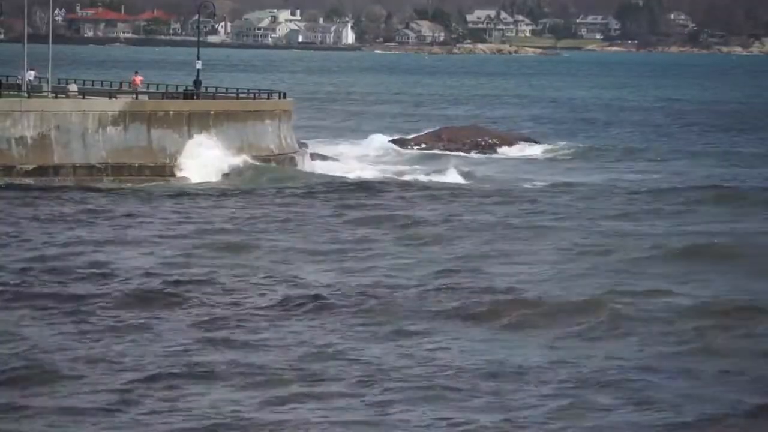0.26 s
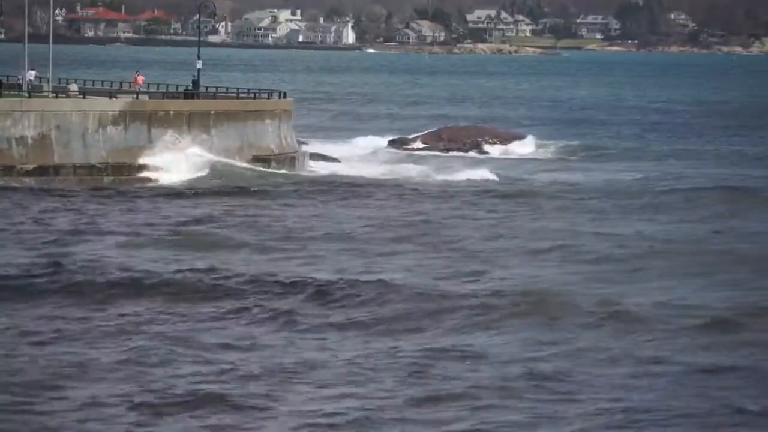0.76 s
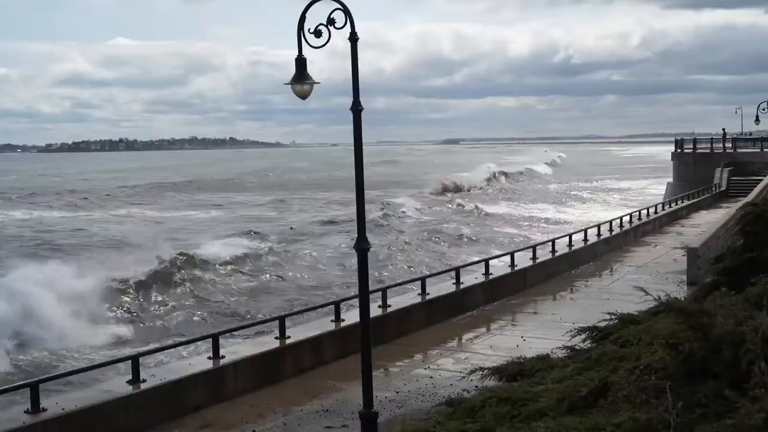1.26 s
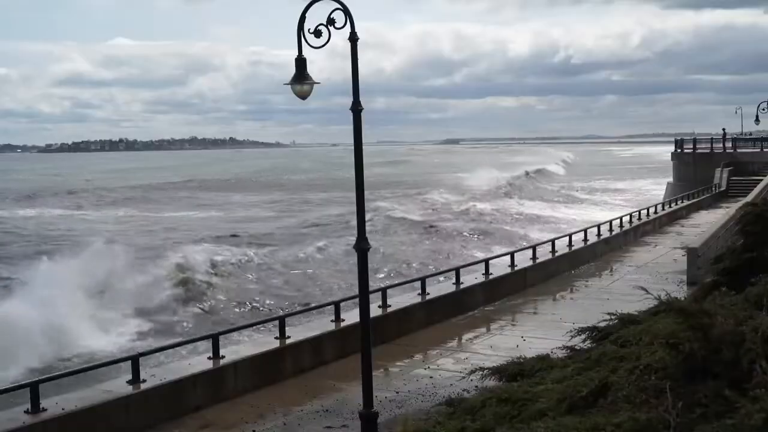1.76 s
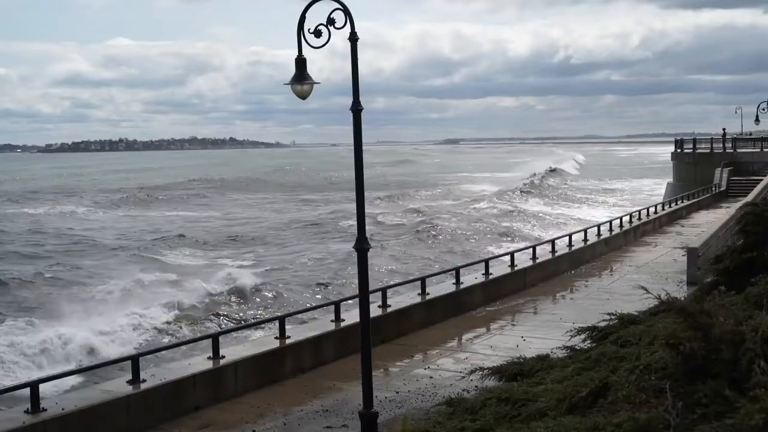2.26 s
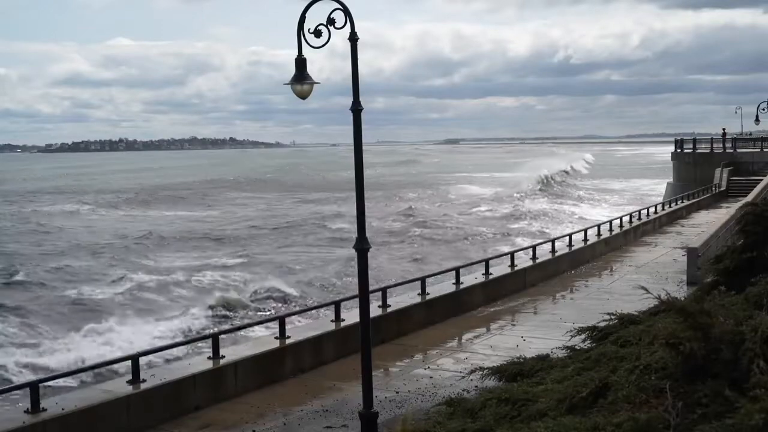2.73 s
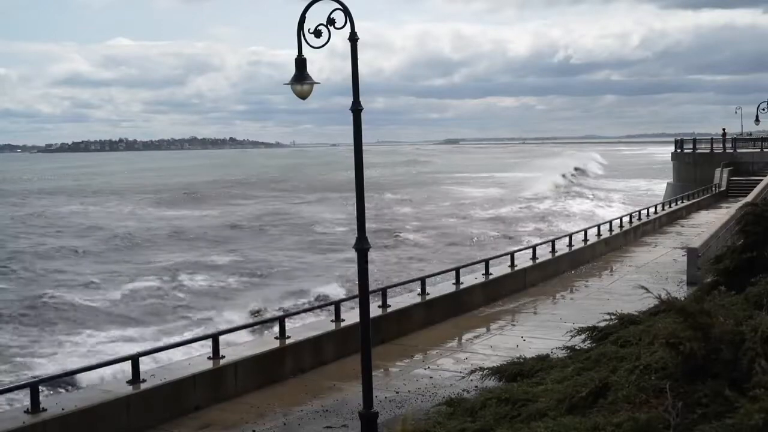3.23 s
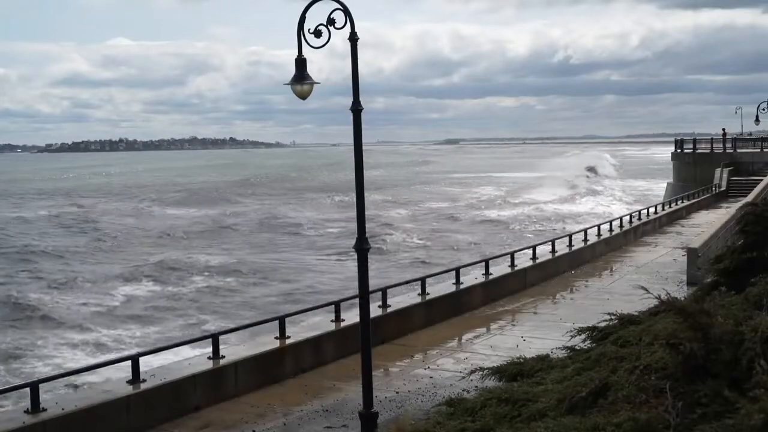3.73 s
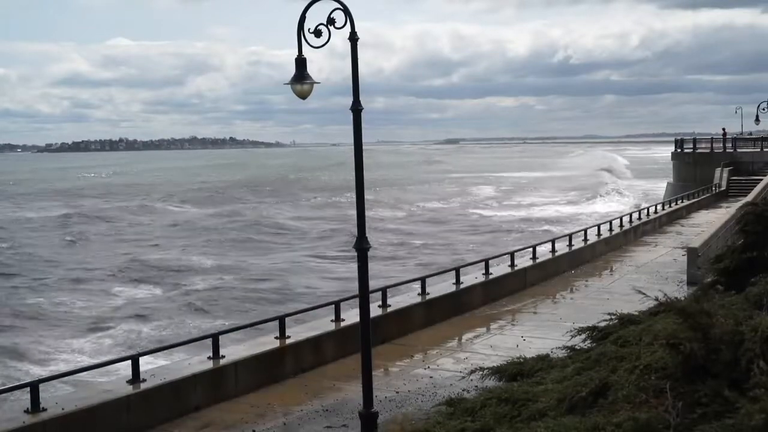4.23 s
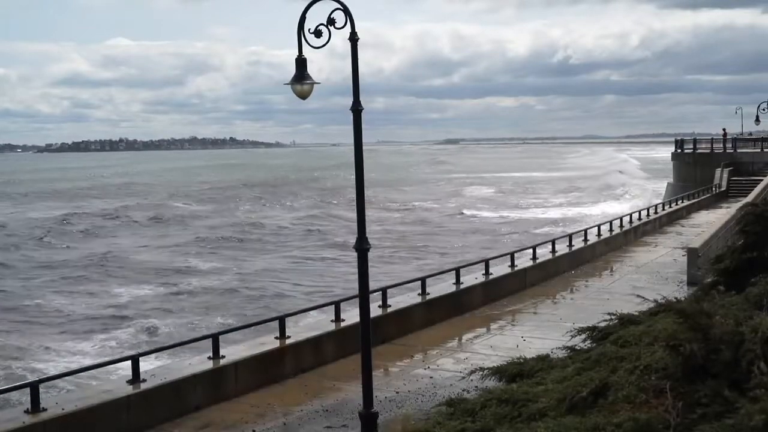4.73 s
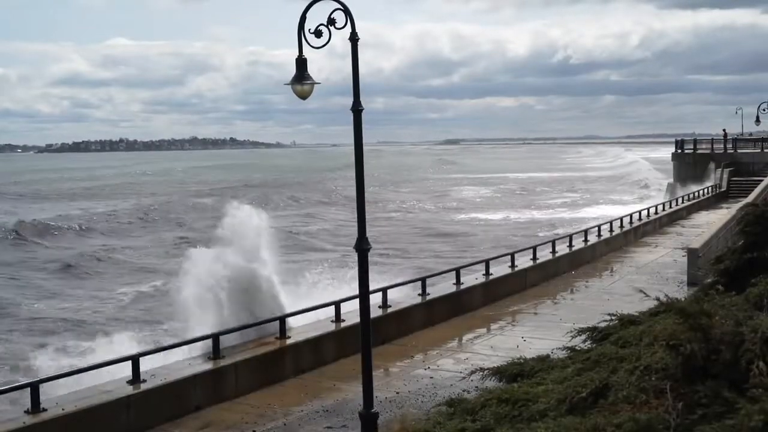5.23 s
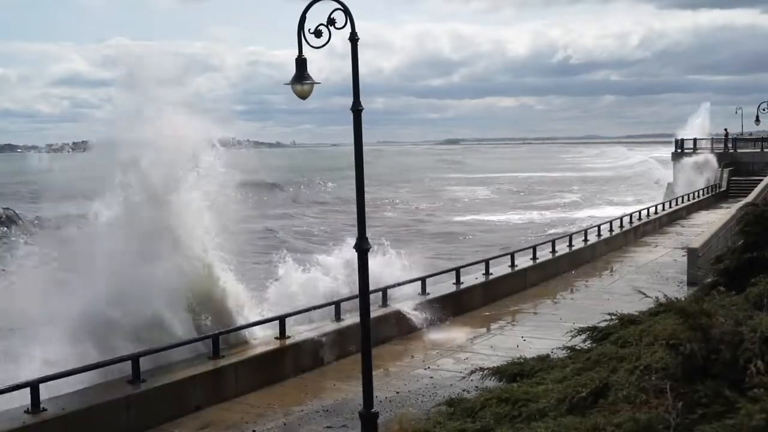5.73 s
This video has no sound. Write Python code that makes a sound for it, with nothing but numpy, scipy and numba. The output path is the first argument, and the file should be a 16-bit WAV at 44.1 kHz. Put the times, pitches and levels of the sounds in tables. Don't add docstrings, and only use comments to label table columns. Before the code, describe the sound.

Outdoors on a stormy coast, far-off surf murmurs under wind thumps for just over a second, then a click and sudden cut bring louder, closer wash. Breakers hiss with spray, then water drains back hollowly under the wall. Wind calms, then batters the unprotected microphone hard, clipping and ducking the surf.

```python
import sys
import numpy as np
from scipy import signal
from scipy.io import wavfile
from scipy.ndimage import uniform_filter1d
from numba import njit

SR = 44100
rng = np.random.default_rng(int(sys.argv[2]) if len(sys.argv) > 2 else 0)


def int16_out(signal):
    q = np.round(np.clip(np.atleast_2d(signal).T, -1, 1) * 32767)
    wavfile.write(sys.argv[1], SR, q.astype(np.int16))


def invert_db(x):
    u = np.asarray(x, float) / 20
    return 10 ** u


N = 264159
T = np.arange(N) / SR
CHANGE_S = 1.2904


def unit(x):
    return x / np.sqrt(np.mean(x ** 2))


def power(db):
    return invert_db(2 * np.asarray(db))


def curves(table):
    s, *cols = np.transpose(table)
    return [np.interp(T, s, col) for col in cols]


def band(x, lo_hz, hi_hz):
    return signal.sosfilt(signal.butter(2, [lo_hz, hi_hz], "band", fs=SR, output="sos"), x)


def band_around(x, hz, width_hz):
    return band(x, hz - width_hz / 2, hz + width_hz / 2)


def noise_band(lo_hz, hi_hz):
    return unit(band(rng.standard_normal(N), lo_hz, hi_hz))


def walk(rate):
    hold = int(SR / rate)
    steps = np.repeat(rng.standard_normal(N // 500), hold)[:N]
    return unit(uniform_filter1d(uniform_filter1d(steps, hold), hold))


def near_change():
    return np.exp(-np.abs(T - CHANGE_S) / .008)


def surges(rows):
    total = 0
    for s, db, rise, fall in rows:
        below_peak = np.where(T < s, (s - T) / rise, (T - s) / fall)
        total = total + power(db - 10 * below_peak)
    return total


# time in seconds, level in dB.
OPEN_SEA = [(0, -36), (.25, -37.5), (.5, -36), (1.29, -35), (1.291, -27.5), (1.45, -38.5), (1.75, -39),
            (2.2, -36.5), (2.6, -35), (2.9, -33.5), (3.5, -35.5), (4.1, -39), (4.5, -39), (5.0, -35),
            (5.3, -39.5), (5.6, -37.5), (5.8, -43.5), (5.99, -42.5)]
# peak in seconds, level in dB, rise in seconds, fall in seconds.
BREAKING_WAVES = [(.55, -45.5, .6, 3), (1.291, -33, .0002, 2.7), (1.93, -32.5, 0.37, 0.55),
                  (2.25, -30, 0.44, 0.31), (2.65, -42.5, 0.24, 0.28), (3.25, -44, .3, 0.12),
                  (3.53, -44, 0.11, 0.29), (4.65, -44, 0.28, 0.31), (4.97, -44, 0.17, 0.37),
                  (5.3, -38, 0.33, 0.4), (5.6, -48, 0.39, 0.083), (6.0, -37.5, 0.21, .2)]
# peak in seconds, level in dB, rise in seconds, fall in seconds.
SPRAY_BURSTS = [(.13, -52.5, .2, 0.44), (.5, -51.5, 0.26, 2.9), (1.0, -55, 0.34, 0.32),
                (1.292, -46, .0002, 0.57), (1.92, -39.5, 0.19, 0.45), (2.24, -41, 0.18, 0.21),
                (2.62, -43.5, .3, .15), (3.47, -54, 0.39, 0.23), (4.65, -60, 0.25, 0.18),
                (5.28, -54.5, 0.12, 0.71), (5.55, -48.5, 0.24, 0.25), (5.75, -52, 0.085, .3),
                (5.99, -45.5, .2, .2)]
# peak in seconds, level in dB, rise in seconds, fall in seconds.
DRAINING = [
    (.6, -44, .3, .8),
    (1.45, -39, .15, 0.36),
    (2.1, -37, 0.18, 0.46),
    (3.4, -36, 0.33, 0.51),
    (3.7, -34, 0.3, 0.63),
    (4.05, -43, 0.27, 0.25),
    (4.3, -35.5, 0.47, 0.63),
    (4.66, -34, 0.21, 0.13),
    (4.95, -39.5, 0.3, 0.11),
]


def sea_levels():
    kinds = [(power(curves(OPEN_SEA)[0]), (-0.5, -3.5, -6, -26, -38)),
             (surges(BREAKING_WAVES), (-1.5, -5, 3, -10, -12)),
             (surges(DRAINING), (-4, -2, -5, -37, -40)),
             (surges(SPRAY_BURSTS), (-10, -10, -19, 0.5, 3))]
    return 10 * np.log10(sum(power(colour_db)[:, None] * p for p, colour_db in kinds))


def hollow():
    ring = unit(band_around(rng.standard_normal(N), 994, 270))
    return ring * invert_db(-0.5) * np.sqrt(surges(DRAINING))


@njit
def bubbles(start, hz, size):
    cycles, glide = 2.5, 0.43
    out = np.zeros(N)
    for k in range(len(start)):
        phase, length = 0., int(3 * cycles * SR / hz[k])
        for i in range(min(length, N - start[k])):
            phase += 2 * np.pi * hz[k] * (1 + glide * i / length) / SR
            out[start[k] + i] += size[k] * np.exp(-6. * i / length) * np.sin(phase)
    return out


def fizz():
    where, pitch, luck = rng.random((30000, 3)).T
    size = invert_db(np.minimum(-3.0 * np.log(luck), 12))
    return unit(bubbles((where * N).astype(np.int64), 500 * 24 ** pitch, size))


WATER_HZ = [480, 1000, 2800, 7500, 13000]
# frequency in Hz, level per third-octave band in dB.
SEA_COLOUR = [(60, 0), (150, 0.5), (300, -0.5), (420, 3.5), (600, 8.5), (1000, 7), (1300, 3.5), (1650, 2),
              (2100, 0), (2600, 0), (3400, -2), (4100, -0.5), (6500, -3.5), (9000, -2), (12000, -11.5),
              (14000, -8.5), (16000, -15)]


def surf():
    levels, foam_fizz = sea_levels(), fizz()
    colour_hz, band_db = np.transpose(SEA_COLOUR)
    out, surge, patch = 0, walk(7.8), walk(2.86)
    for hz in 63 * 2 ** np.arange(0, 8.1, 1 / 3):
        share = np.array([np.interp(np.log(hz), np.log(WATER_HZ), row) for row in np.eye(len(WATER_HZ))])
        colour_db = np.interp(np.log(hz), np.log(colour_hz), band_db) - 6
        patch = unit(2.4 * patch + 0.19 * walk(2.1))
        heave_db = 0.78 * surge + 0.28 * patch + 0.36 * walk(20)
        water = unit(band(rng.standard_normal(N) + 0.54 * foam_fizz, hz / 1.15, hz * 1.123))
        out = out + water * invert_db(share @ levels + colour_db + heave_db)
    return out + hollow()


# time in seconds, level in dB.
WIND_STRENGTH = [(0, -14.5), (.25, -29), (.37, -34), (.55, -19), (.8, -24), (1.1, -22), (1.35, -21),
                 (1.55, -28.5), (2.45, -31), (3.0, -24), (3.58, -25.5), (3.68, -10), (4.2, -8.5),
                 (4.66, -14), (4.76, -10), (5.2, -10), (5.5, -13.5), (5.99, -12)]
# time in seconds, rumble in dB, length in seconds, flutter above rumble in dB.
ROLLING_EDDIES = [(0.25, -10, 0.045, -24), (0.438, -14, 0.035, -25), (0.494, -22.5, 0.022, 10),
                  (0.633, -8.5, .04, -31), (0.72, -15, 0.031, -20), (0.952, -14.5, 0.063, -21),
                  (1.29, -20, .1, -16), (1.674, -35.5, 0.05, 3), (1.785, -35, 0.032, 1),
                  (2.25, -34.5, 0.066, 13), (2.566, -22, 0.036, -12), (2.78, -35.5, 0.14, 9.5),
                  (3.033, -21.5, 0.069, -5), (3.29, -19, 0.056, -2), (3.381, -27.5, .04, 6.5),
                  (3.48, -19, 0.044, -10), (3.85, -14, 0.046, -7), (3.972, -10.5, 0.23, -3),
                  (4.207, -9, 0.023, -20), (4.41, -10, 0.06, -18), (4.667, -35, 0.026, 7),
                  (4.813, -8.5, 0.059, -30), (4.934, -20.5, 0.039, 8.5), (5.056, -3, 0.037, -3.5),
                  (5.175, -20, 0.11, 7.5), (5.33, -7, 0.092, -6), (5.55, -20, 0.13, 8.5),
                  (5.634, 1.5, 0.041, -17), (5.782, -15, .06, 1), (5.857, -7, 0.15, -28)]


def gusts():
    wind_db = curves(WIND_STRENGTH)[0]
    slow, quick = 0, 0
    for s, db, length, flutter_db in ROLLING_EDDIES:
        bump = np.exp(-((T - s) / length) ** 2)
        slow = slow + power(db) * bump
        quick = quick + power(db + flutter_db) * bump
    rumble = power(wind_db - 2.5) + slow
    flutter = power(-19 + 0.48 * wind_db) + quick
    rustle = power(-32.5 + 0.064 * wind_db) + power(-22.5) * quick
    return 10 * np.log10([rumble, flutter, rustle])


# time in
# seconds, # signed pressure, width in ms.
BUFFETS = [(0.13, -0.39, 11.6), (0.2418, -0.37, 18), (0.4867, 0.5, 16), (0.661, 0.38, 19),
           (0.7527, -0.45, 6.9), (0.7667, 0.57, 8.7), (3.8192, -0.6, 12), (3.9598, 0.61, 8.6),
           (4.0329, -0.66, 7.6), (4.1253, -0.72, 11.1), (4.1533, 0.59, 7.7), (4.18, -0.59, 10.9),
           (4.873, -0.63, 11.1), (4.951, -0.62, 11.4), (5.0579, 0.68, 5.9), (5.0793, -0.64, 17.7),
           (5.1118, 0.57, 8.1), (5.1575, 0.62, 6.2), (5.277, 0.72, 9.4), (5.3222, 0.74, 10.2),
           (5.367, 0.7, 10.3), (5.599, 0.64, 5.6), (5.6185, 0.71, 8.1), (5.6469, 0.71, 7.2),
           (5.6564, -0.67, 14), (5.6994, -0.64, 4.6), (5.7211, 0.68, 5.8), (5.7474, -0.71, 6.8),
           (5.8326, -0.61, 14), (5.988, -0.35, 10)]


def buffets():
    thump, hold = np.zeros(N), np.zeros(N)
    for s, push, ms in BUFFETS:
        u = (T - s - .0015) / (0.00068 * ms)
        overshoot = invert_db(41.0 * max(abs(push) - .55, 0))
        thump += push * overshoot * (1 - 0.91 * u ** 2) * np.exp(-u ** 2 / 2)
        hold = np.maximum(hold, np.exp(-u ** 2 / 4))
    return thump, hold


def wind():
    rumble_db, flutter_db, rustle_db = gusts()
    rumble = noise_band(14, 48) * invert_db(rumble_db - 1.5 + 1.2 * walk(12))
    flutter = noise_band(44.6, 104.2) * invert_db(flutter_db - 3.5 + 0.98 * walk(7.8))
    rustle = noise_band(123.6, 252.6) * invert_db(rustle_db + 0.96 * walk(15))
    thump, hold = buffets()
    eddies = .62 * np.tanh((rumble + flutter) / .62)
    return eddies * (1 - 0.93 * hold) + thump + rustle


def tick():
    impulse = 1. * (np.arange(N) == int(.6292 * SR))
    return invert_db(-27) * band_around(impulse, 9700, 4600)


# time in seconds, pitch in Hz, level in dB.
MACHINERY = [
    (0, 118.9, -40),
    (1.9, 116, -37.5),
    (2.3, 117, -31.5),
    (2.6, 118.4, -41.5),
    (2.9, 119.8, -30.5),
    (3.3, 120.1, -32.5),
    (3.8, 120.5, -25),
    (4.0, 120.3, -41),
    (4.8, 119.2, -30),
    (6, 121, -45),
]


def drone():
    hz, db = curves(MACHINERY)
    phase = 2 * np.pi * np.cumsum(hz + 0.76 * walk(5.5)) / SR
    return invert_db(db + 1.5 + 1.3 * walk(6.65)) * np.sin(phase)


def scene():
    sea = surf()
    sea = sea + invert_db(-2.5) * band_around(sea, 3253, 950)
    return (sea + drone() + tick() + wind() * (1 - near_change()))[None]


@njit
def follow(x, attack, release):
    out, e = np.empty(len(x)), 0.
    for i in range(len(x)):
        e += (abs(x[i]) - e) * (attack if abs(x[i]) > e else release)
        out[i] = e
    return out


def low_pass(x, top_hz):
    return signal.sosfilt(signal.ellip(14, .1, 70, top_hz, fs=SR, output="sos"), x)


def band_limit(x):
    return signal.sosfilt(signal.butter(12, 16510, fs=SR, output="sos"), x)


def record(dry):
    attack_s, release_s, threshold, clip = 0.0029, 0.012, 0.526, .693
    peak = follow(dry[0], 1 / (attack_s * SR), 1 / (release_s * SR))
    gain = np.minimum(1, threshold / (peak + 1e-9)) ** 1.05
    limited = low_pass(np.clip(dry * gain, -clip, clip), 15700)
    joint = uniform_filter1d(-.2 * np.sign(T - CHANGE_S) * near_change(), size=2)
    return band_limit(limited + joint)


dry = scene()
out = record(dry)
int16_out(out)
```